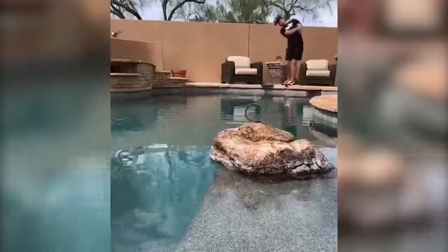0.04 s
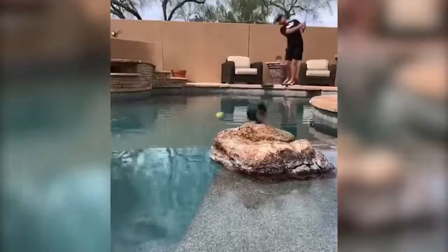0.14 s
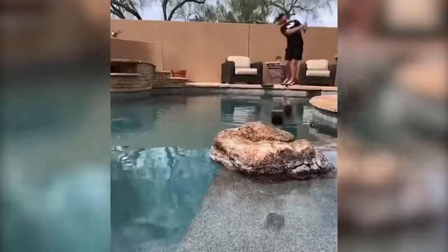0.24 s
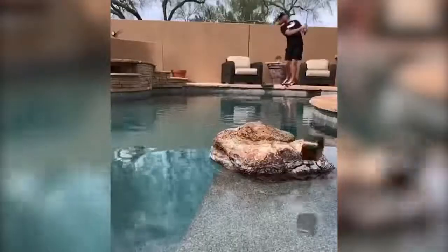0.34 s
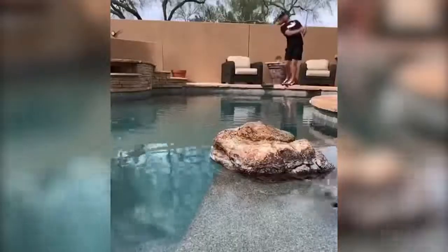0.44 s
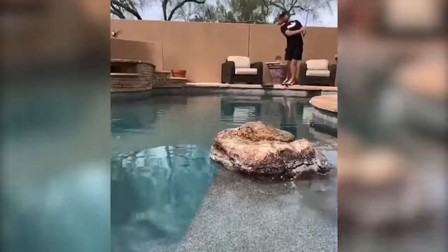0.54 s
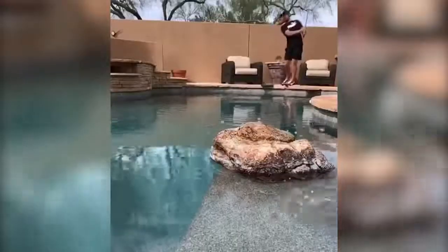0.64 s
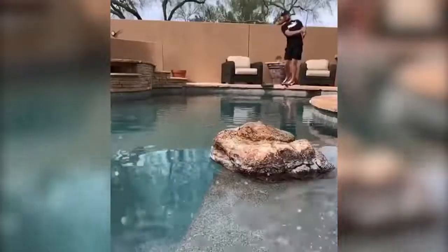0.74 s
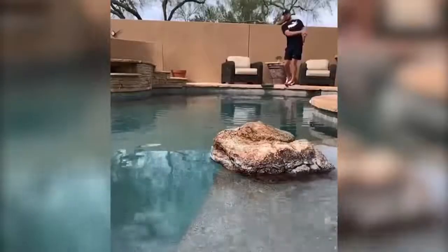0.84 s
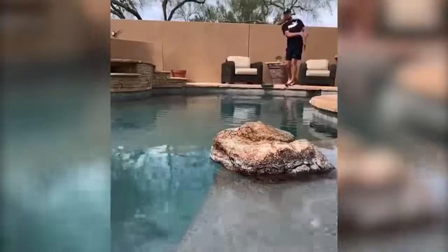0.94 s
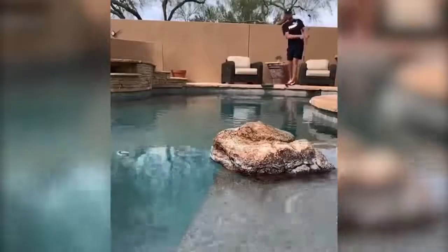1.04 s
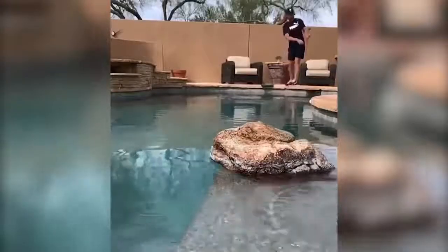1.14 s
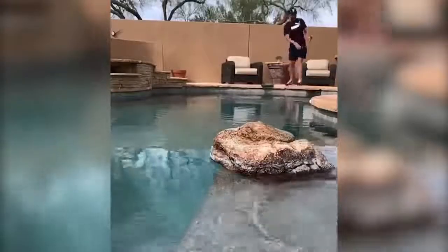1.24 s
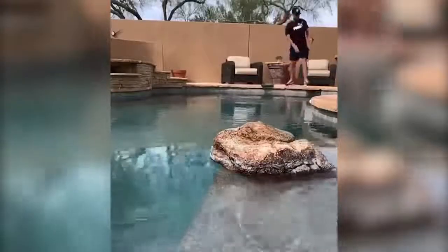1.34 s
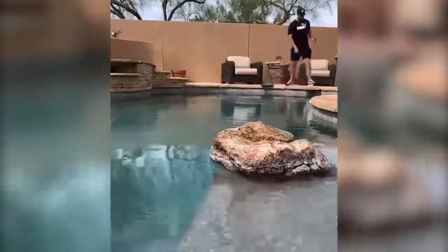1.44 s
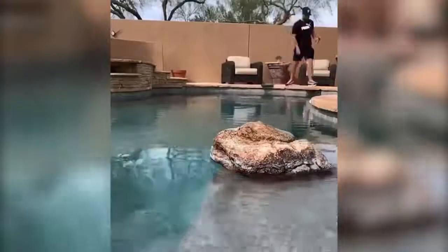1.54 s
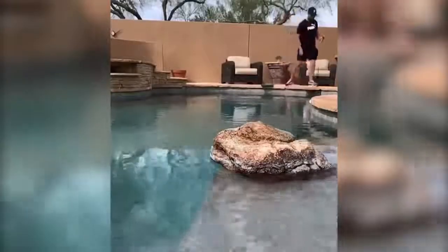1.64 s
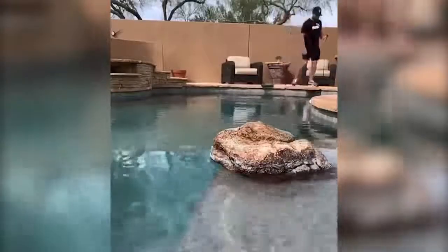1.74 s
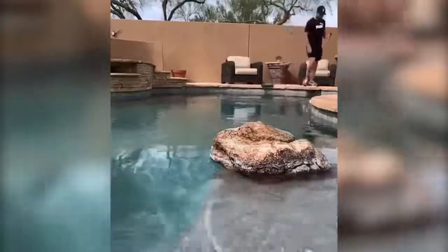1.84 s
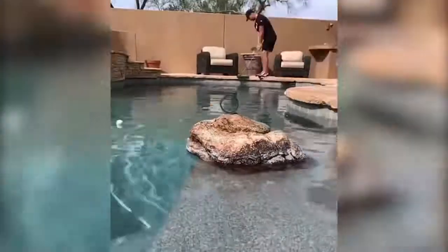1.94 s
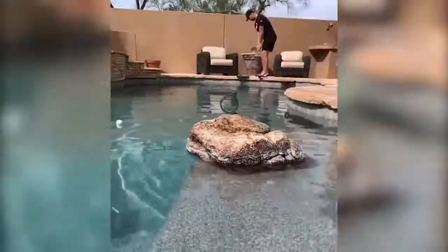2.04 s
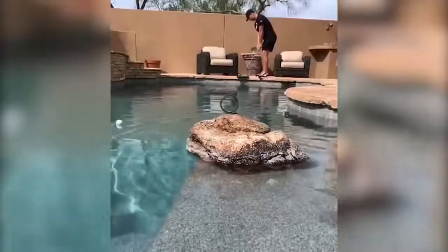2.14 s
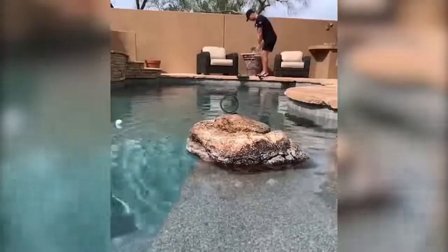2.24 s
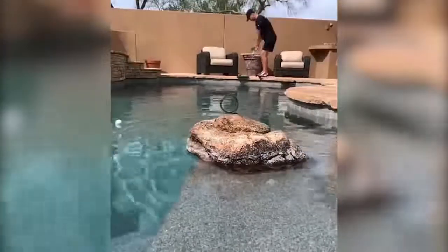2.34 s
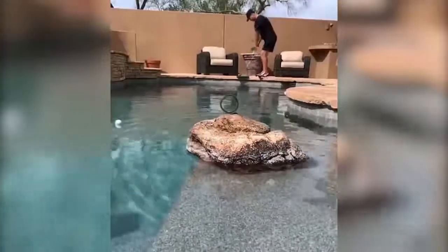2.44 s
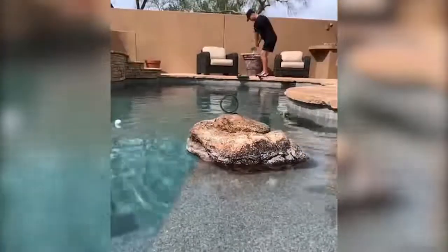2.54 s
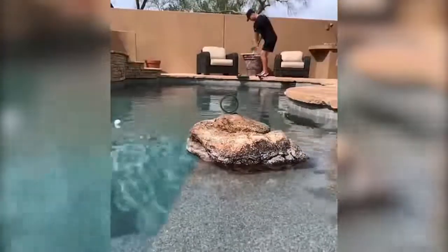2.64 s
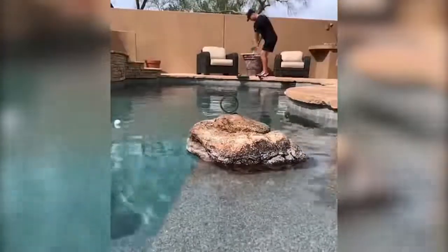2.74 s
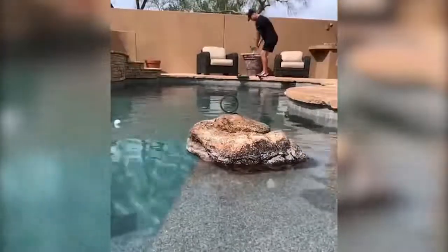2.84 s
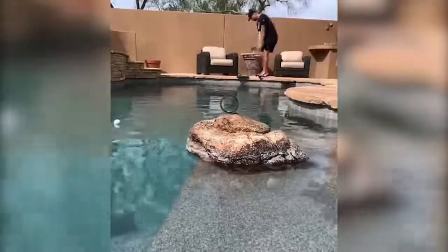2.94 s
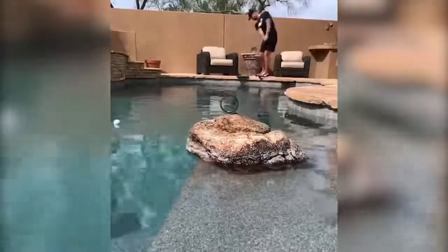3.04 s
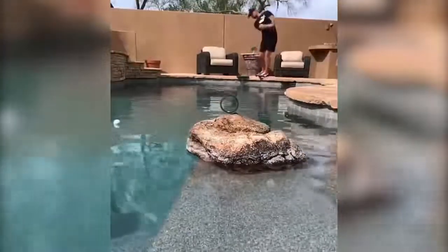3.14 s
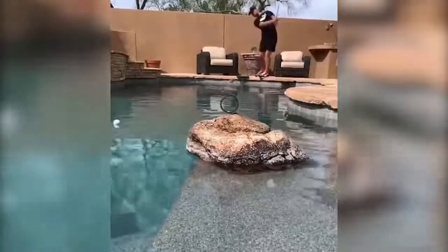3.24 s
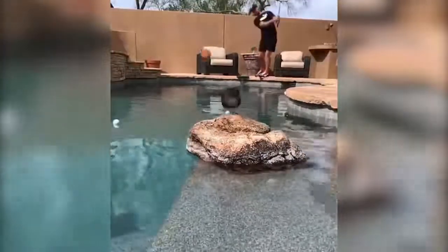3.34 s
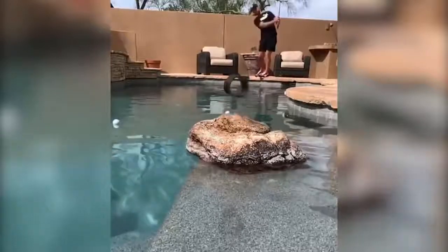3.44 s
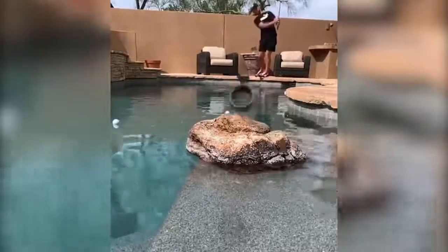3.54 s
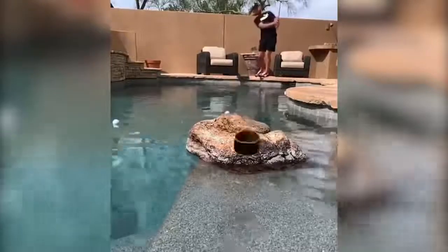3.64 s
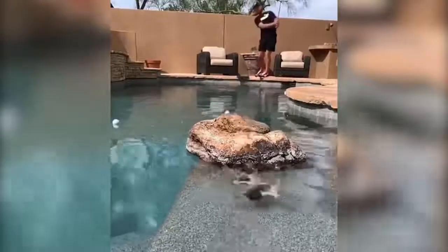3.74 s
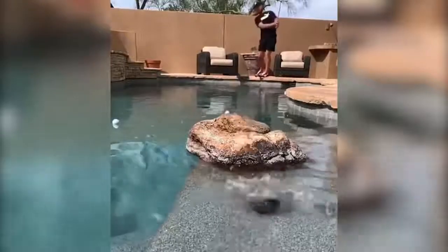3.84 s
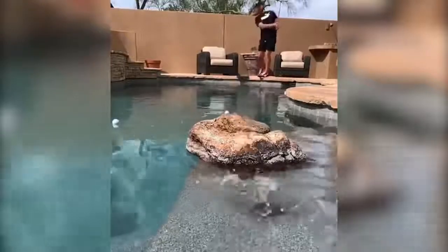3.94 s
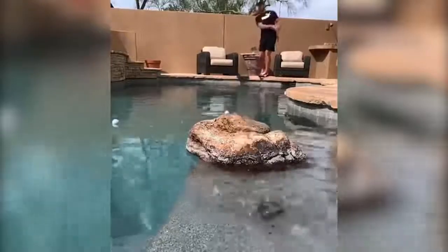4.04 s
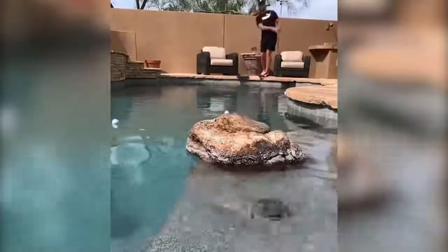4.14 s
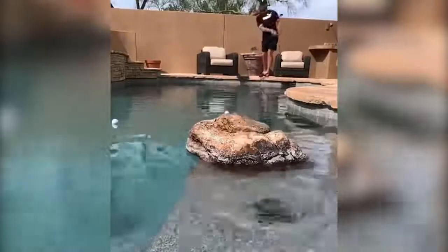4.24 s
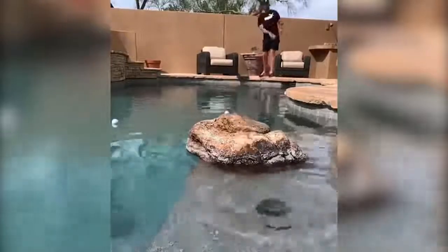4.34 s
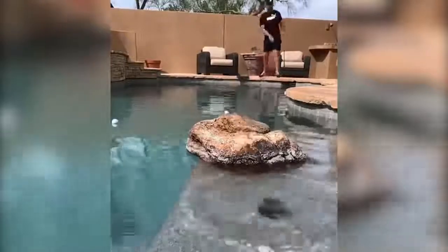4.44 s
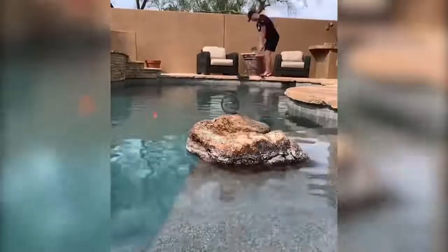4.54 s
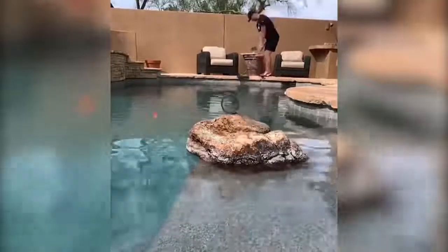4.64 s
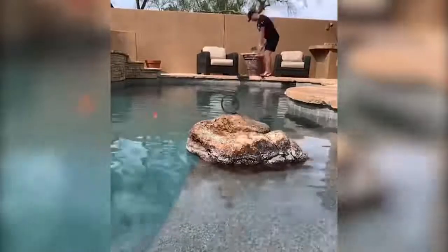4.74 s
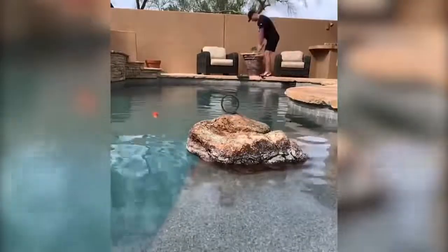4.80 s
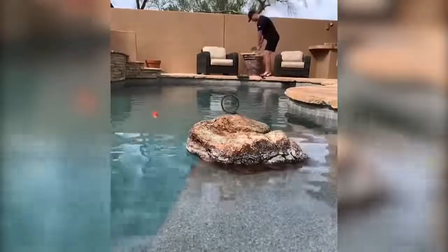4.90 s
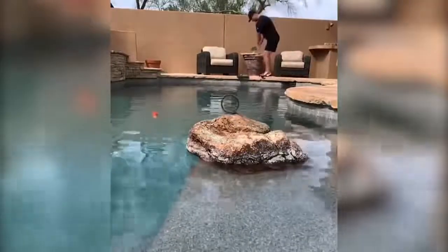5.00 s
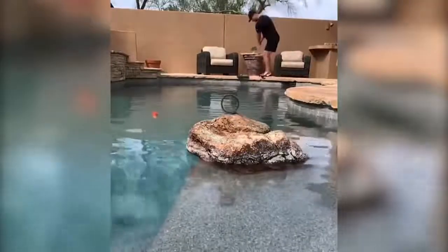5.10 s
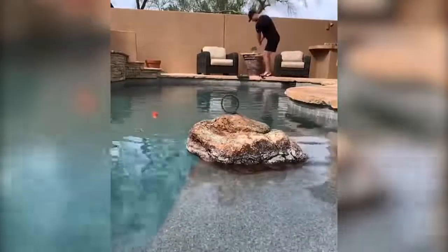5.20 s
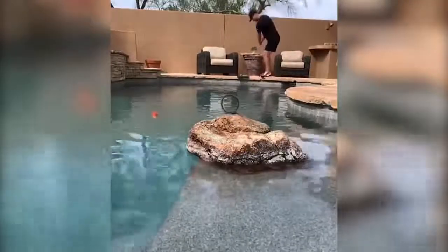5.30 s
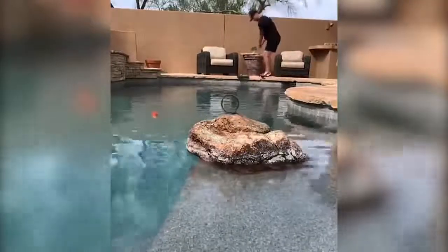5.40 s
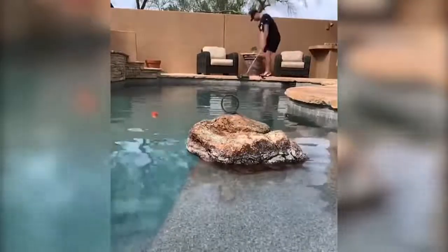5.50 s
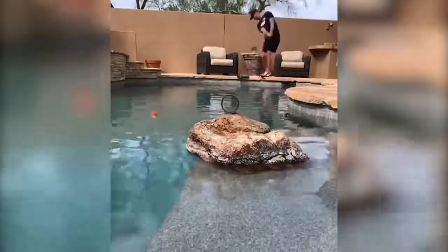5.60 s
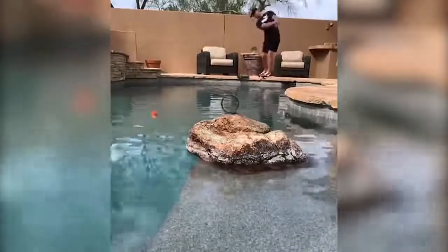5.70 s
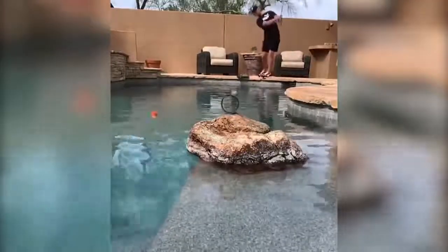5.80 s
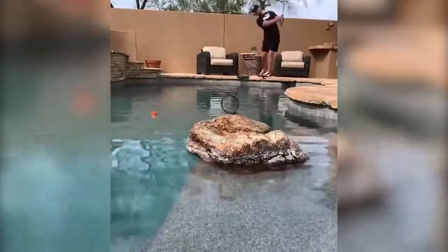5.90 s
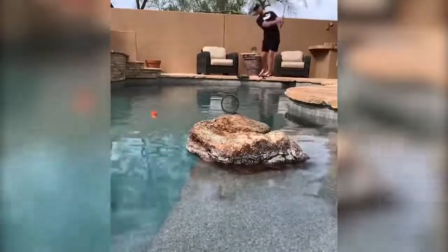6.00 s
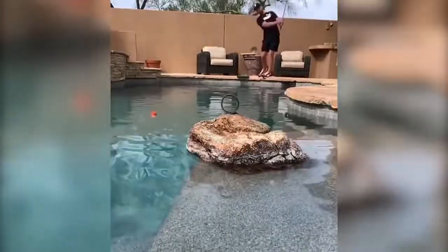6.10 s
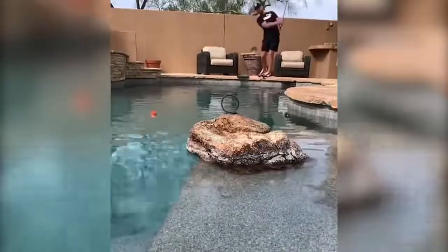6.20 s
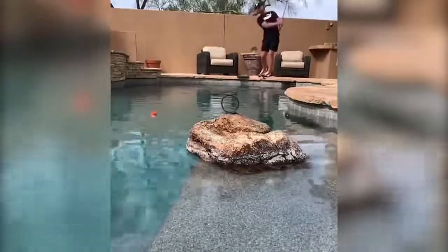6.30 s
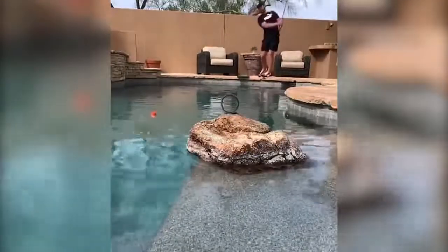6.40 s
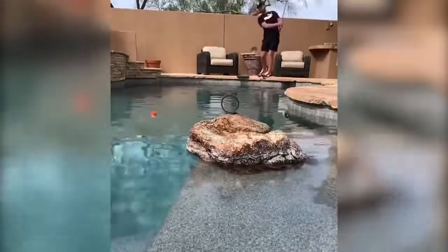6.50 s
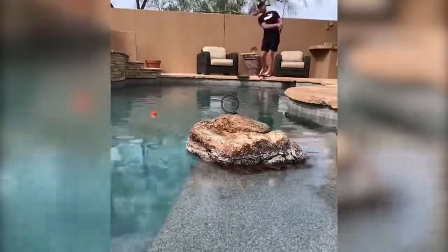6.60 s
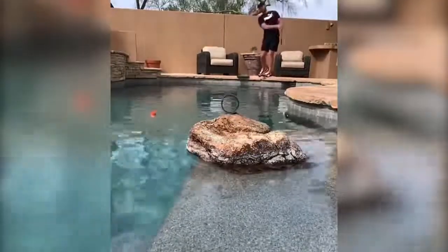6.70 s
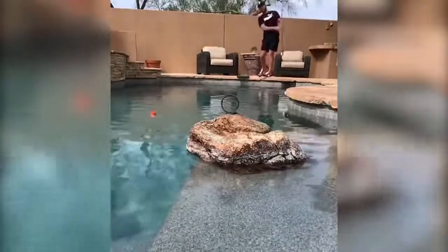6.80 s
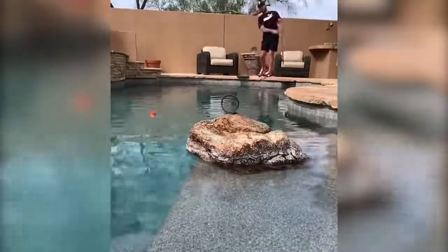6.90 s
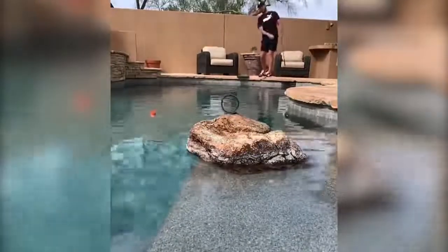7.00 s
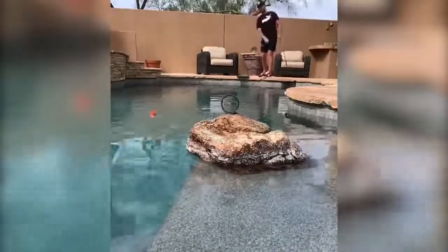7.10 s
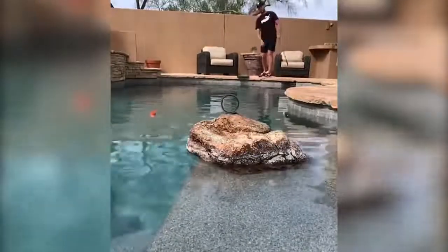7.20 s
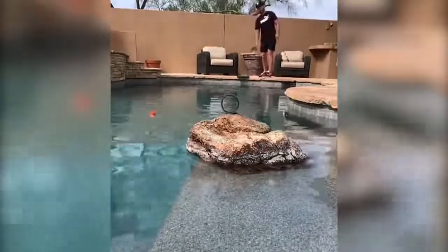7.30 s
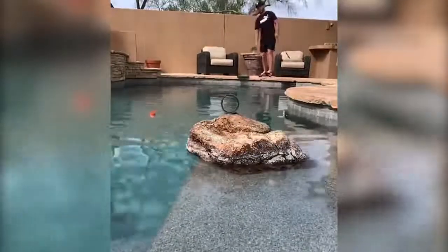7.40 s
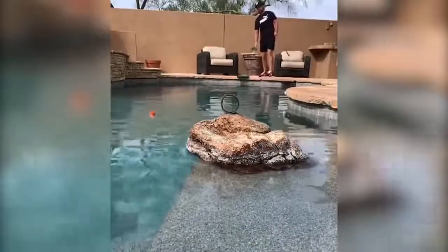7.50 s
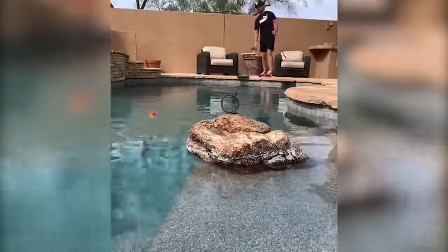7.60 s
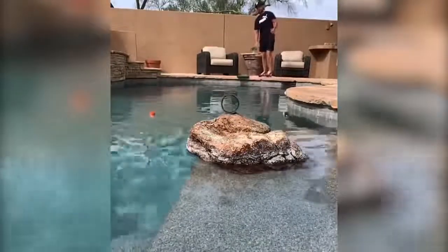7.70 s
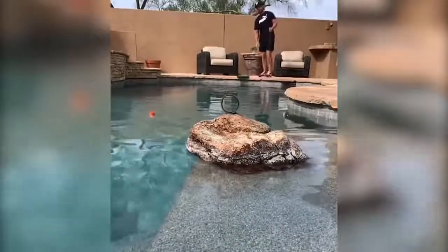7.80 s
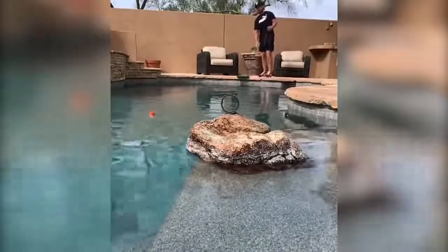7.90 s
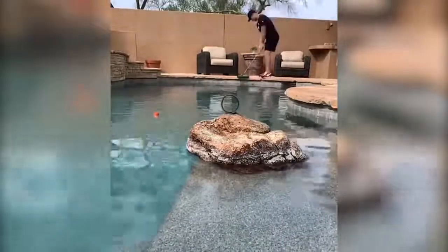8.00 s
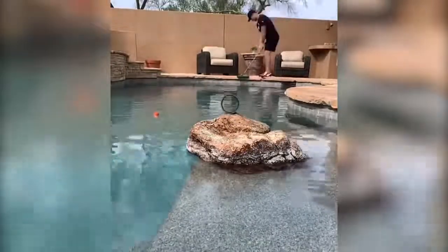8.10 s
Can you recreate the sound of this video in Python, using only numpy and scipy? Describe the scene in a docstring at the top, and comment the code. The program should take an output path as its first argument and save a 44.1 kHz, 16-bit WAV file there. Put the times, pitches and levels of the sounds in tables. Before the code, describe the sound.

A quiet low outdoor rumble fills a walled backyard. At 0.2 s a golf ball cracks off a boulder near the microphone, a click and solid clack sinking into a thud with short wall echoes. A light splash starts at 0.3, a second knock lands at 0.4, and at 0.55 a wet pop opens a gurgling, spraying splash, slapping and bubbling until about 0.9, then fizzing away. Around 3.0 a club chips a ball across the pool: sharp double click-thud and faint scrape. The ball knocks rock at 3.3 and slaps into water at 3.7, with bubbles chirping until 4.1. The level dips briefly at 4.5. A brighter chip comes at 5.55, then the hardest rock crack at 5.95, with deep thump and hollow ring. A thin splash at 6.3 drips away; small plops follow at 6.7 and 7.7, a faint slap at 7.1, and another brief dip at 8.0.

```python
"""A ball cracks off a boulder near the microphone, over a low outdoor rumble, then splashes into a pool.
This is a walled backyard where golf balls are chipped across the water: each blow is a click, a clack and
a thud sinking in pitch, answered by the walls. The water is made of noise bursts, ringing bubbles,
gurgling churn and fine spray. The level dips briefly, twice."""
import sys
import numpy as np
from scipy import signal
from scipy.fft import rfft, irfft, next_fast_len
from scipy.io import wavfile
from scipy.ndimage import uniform_filter1d, map_coordinates

SR = 44100
rng = np.random.default_rng(int(sys.argv[2]) if len(sys.argv) > 2 else 0)


def log_audio(samples):
    """Write samples as a 16-bit WAV file to the path given in sys.argv[1]."""
    # one column per channel
    frames = np.atleast_2d(samples).T
    # limit to full scale, then quantise
    limited = np.clip(frames, -1, 1)
    pcm = np.round(limited * 32767).astype(np.int16)
    wavfile.write(sys.argv[1], SR, pcm)


N = 359407  # length in samples

# Spectrum of fine spray and scraping. Each row: frequency in Hz, density in dB per Hz.
SPRAY_SPECTRUM = [(1500, -13), (2500, -5), (3300, -8.5), (4200, -5), (5300, -6.5), (7500, -2), (10300, -7),
                  (13000, -23)]
# Spectrum of churning water. Each row: frequency in Hz, density in dB per Hz.
CHURN_SPECTRUM = [(200, -3.5), (450, 0), (1000, -7), (2200, -2), (3300, -11), (6000, -37.5)]
# Spectrum of a hard click or a drop's tick. Each row: frequency in Hz, density in dB per Hz.
CLICK_SPECTRUM = [(1200, -19.5), (2600, -0.5), (4200, 3), (5300, -2.5), (8000, -4.5), (13000, -24)]
# Spectrum of bright reflections off the walls. Each row: frequency in Hz, density in dB per Hz.
SCATTER_SPECTRUM = [(400, -4.5), (1500, 4), (3000, -1.5), (5400, -9), (8000, -9), (10500, -23),
                    (13000, -36)]


def amp(db):
    """Decibels to gain."""
    return 10 ** (np.asarray(db) / 20)


def unit(x):
    """Scale to rms 1."""
    return x / np.sqrt(np.mean(x ** 2) + 1e-20)


def along(points, hz):
    """Rows of frequency and value, read on a log frequency axis."""
    f, v = np.transpose(points)
    return np.interp(np.log(hz + 1), np.log(f + 1), v)


def filtered(x, response):
    """Filter x by a complex response of frequency, padded so that little wraps round."""
    n = x.shape[-1]
    padded = next_fast_len(n + 8192)
    spectrum = rfft(x, padded) * response(np.fft.rfftfreq(padded, 1 / SR))
    return irfft(spectrum, padded)[..., :n]


def coloured(x, spectrum):
    """Shape x by a spectrum, at rms 1."""
    return unit(filtered(x, lambda hz: amp(along(spectrum, hz))))


def add(track, s, sound):
    """Mix a sound into the track at s seconds."""
    part = track[..., round(s * SR):][..., :sound.shape[-1]]
    part += sound[..., :part.shape[-1]]


def spread(pair, side_db):
    """Left and right from a shared signal and an opposed one, side_db relative to it."""
    mid, side = pair[0], amp(side_db) * pair[1]
    return np.array([mid + side, mid - side]) / np.sqrt(1 + amp(side_db) ** 2)


def burst(t, spectrum, rise, t60, side_db, rate=SR):
    """A stereo crack of fixed energy from random impulses, rate a second; rise and t60 in seconds."""
    shape = (1 - np.exp(-t / rise)) * amp(-60 * t / t60)
    struck = rng.random(len(t)) < rate / SR
    impulses = rng.standard_normal((2, len(t))) * struck
    noise = spread(coloured(impulses, spectrum), side_db)
    return unit(noise * shape) * np.sqrt(np.mean(shape ** 2))


def ports(x, lead):
    """The sound reaches the left microphone port lead seconds before the right."""
    return filtered(x, lambda hz: np.exp(1j * np.pi * hz * lead * np.array([[1], [-1]])))


def wobble(rate):
    """A random curve of straight lines between knots, rate knots a second."""
    knots = rng.standard_normal(int(N * rate / SR) + 4)
    return map_coordinates(knots, [np.arange(N) * rate / SR], order=1)


def patchy(x, depth_db, size):
    """Random patches of gain, size = (frequency bins, frames) across."""
    z = signal.stft(x, nperseg=512)[2]
    field = uniform_filter1d(rng.standard_normal(z.shape[1:]), size[0], 0)
    field = uniform_filter1d(field, size[1], 1)
    return signal.istft(z * amp(depth_db * unit(field)), nperseg=512)[1][:, :N]


def air():
    """A low outdoor rumble, nearly alike in both ears, with a faint wider hiss: shaped noise."""
    # Loudness of the open air. Each row: time in seconds, level in dB.
    air_levels = [(0, -46), (1.599, -46.5), (8.15, -45)]
    # Spectrum of the open air. Each row: frequency in Hz, density in dB per Hz.
    rumble_spectrum = [(15, -40), (25, -28), (45, -2), (74, 0.5), (122, -6.5), (213, -17), (278, -14),
                       (372, -26.5), (584, -40), (991, -43), (1260, -41.5), (2500, -49.5), (9660, -61),
                       (14000, -75)]
    rumble_gain = amp(np.interp(np.arange(N) / SR, *np.transpose(air_levels)))
    mid, side = coloured(rng.standard_normal((2, N)), rumble_spectrum)
    width = [(70, -32.5), (300, -12.5), (1500, -4.0)]  # Hz, dB
    side = filtered(side, lambda hz: amp(along(width, hz)))
    return rumble_gain * np.array([mid + side, mid - side])


def hiss_swells():
    """A faint hiss of shaped noise swells and fades, just before the last boulder blow and once more later."""
    # Faint hiss swells. Each row: loudest moment in seconds, half width in seconds, level in dB.
    swell_rows = [(5.911, 0.042, -60), (7.373, 0.018, -68)]
    # Spectrum of the hiss. Each row: frequency in Hz, density in dB per Hz.
    hiss_spectrum = [(1000, -14), (2800, -9), (4100, -3), (5400, -14.5), (8000, -14.5), (12000, -30.5)]
    t = np.arange(N) / SR
    gain = sum(amp(db) * np.exp(-.5 * ((t - s) / width) ** 2) for s, width, db in swell_rows)
    return gain * spread(coloured(rng.standard_normal((2, N)), hiss_spectrum), side_db=-6.0)


def scrapes():
    """The club scrapes on after each chip: a short burst of bright noise."""
    # The club's follow-through. Each row: start in seconds, level in dB.
    scrape_rows = [(3.031, -47), (5.638, -44.5)]
    out, t = np.zeros((2, N)), np.arange(SR // 4) / SR
    for s, db in scrape_rows:
        add(out, s, amp(db) * burst(t, SPRAY_SPECTRUM, rise=0.0024, t60=0.15, side_db=-1))
    return out


def grains(rate, centre_hz, octaves, cycles, scatter_db, size):
    """A stream of damped bubbles, each rising a little in pitch, rate a second, at rms 1."""
    count = int(rate * N / SR)
    start = rng.integers(0, N, (count, 1))
    hz = np.clip(centre_hz * 2 ** (octaves * rng.standard_normal((count, 1))), 200, SR / 3)
    gain = amp(scatter_db * np.minimum(rng.exponential(size=(count, 1)), 2.5))
    k = np.arange(size)
    turns = hz * k / SR
    life = np.exp(-turns / cycles)
    tones = np.sin(2 * np.pi * turns * (1 + .1 * (1 - life)))
    waves = gain * tones * life * (1 - k / size)
    return unit(np.bincount((start + k).ravel(), waves.ravel(), minlength=N)[:N])


def swell(t, attack, hold, sag_db, t60, linger_db, drop_db):
    """Gain of a splash: it builds, holds while water is in the air, dies away and leaves the pool unsettled."""
    landing_s, settle_t60_s = 0.014, 2.5  # the sheet of water lands; the pool settles
    after = np.maximum(t - attack - hold, 0)
    held = np.clip(t / attack, 0, 1) * amp(-sag_db * np.clip(t - attack, 0, hold))
    release = amp(-drop_db * np.minimum(after / landing_s, 1) - 60 * after / t60)
    return held * np.maximum(release, amp(linger_db - 60 * after / settle_t60_s))


def splash_gains():
    """Gain of the churn and of the spray; overlapping splashes add in power."""
    # Splashes and the last drops falling back. Each row: start in seconds, attack in seconds,
    # hold in seconds, churn level in dB, spray level in dB.
    splash_rows = [ (0, 0.0009, 0.014, -58, -58), (0.312, 0.014, 0.019, -56.5, -47.5),
                   (0.426, 0.049, 0.095, -54.5, -48.5), (0.53, 0.013, 0.17, -48.5, -52),
                   (0.669, 0.097, 0.034, -50.5, -45), (1.0, 0.15, 0.11, -110, -71),
                   (3.731, 0.0071, 0.05, -57, -50.5), (3.755, 0.028, 0.15, -50.5, -51),
                   (3.961, 0.033, 0.04, -59, -52), (6.328, 0.0065, 0.017, -66.5, -51.5),
                   (6.361, 0.033, 0.13, -67, -60.5), (6.628, 0.038, 0.04, -69.5, -70.5), ]
    # sag in dB per second of hold, t60 in seconds; the spray also thins at once as it lands
    churn_swell = dict(sag_db=7.5, t60=0.7, linger_db=-13, drop_db=0)
    spray_swell = dict(sag_db=6.5, t60=.75, linger_db=-19.5, drop_db=6.5)
    t = np.arange(N) / SR
    churn, spray = [], []
    for s, attack, hold, churn_db, spray_db in splash_rows:
        churn.append(amp(churn_db) * swell(t - s, attack, hold, **churn_swell))
        spray.append(amp(spray_db) * swell(t - s, attack, hold, **spray_swell))
    return np.linalg.norm(churn, axis=0), np.linalg.norm(spray, axis=0)


def splashes():
    """Churning froth, gurgling bubbles and clumps of coarse droplets under a dense wash of fine spray."""
    def stereo_grains(**settings):
        """Two independent streams of bubbles."""
        return np.array([grains(**settings) for _ in range(2)])

    churn_gain, spray_gain = splash_gains()
    froth = stereo_grains(rate=2400, centre_hz=1400, octaves=.9, cycles=2, scatter_db=3, size=256)
    gurgle = stereo_grains(rate=420, centre_hz=1450, octaves=.65, cycles=7, scatter_db=4, size=900)
    coarse = stereo_grains(rate=900, centre_hz=3900, octaves=.35, cycles=9, scatter_db=4, size=400)
    fizz = stereo_grains(rate=2200, centre_hz=6500, octaves=.5, cycles=10, scatter_db=4, size=256)
    churn = coloured(patchy(.8 * froth + gurgle, depth_db=3.5, size=(7, 4)), CHURN_SPECTRUM)
    droplets = amp(-6) * unit(coarse * amp(4 * wobble(rate=60)))  # 6 dB under the churn
    wash = fizz + rng.standard_normal((2, N))
    spray = coloured(patchy(wash, depth_db=3.2, size=(12, 7)), SPRAY_SPECTRUM)
    churning = churn_gain * spread(churn + droplets, side_db=-6.0)
    return churning + spray_gain * spread(spray, side_db=2.0)


def drips():
    """Single drops hit the surface with a sharp tick of noise."""
    # Single drops. Each row: start in seconds, level in dB.
    drip_rows = [(0.534, -34.5), (.921, -47), (6.3746, -50), (6.461, -52), (6.56, -55)]
    out, t = np.zeros((2, N)), np.arange(SR // 25) / SR
    for s, db in drip_rows:
        add(out, s, amp(db) * burst(t, CLICK_SPECTRUM, rise=0.00041, t60=0.053, side_db=-8))
    return out


def plops():
    """Clusters of bubbles burst together in a blurred, hollow plop: noise peaked around one pitch."""
    # Soft plops. Each row: start in seconds, level in dB, pitch in Hz.
    plop_rows = [(.964, -44, 1235), (6.678, -54, 2154), (7.703, -51, 988)]
    out, t = np.zeros((2, N)), np.arange(SR // 5) / SR
    for s, db, hz in plop_rows:
        hollow = [(hz / 2, -26), (hz, 0), (hz * 2, -26), (hz * 10, -60)]
        add(out, s, amp(db) * burst(t, hollow, rise=0.0038, t60=0.11, side_db=-5.5))
    return out


def bubbles():
    """Trapped air pinches off with a wet pop and rings; short-lived bubbles chirp upwards."""
    # The largest bubbles. Each row: start in seconds, level in dB, starting pitch in Hz, t60 in seconds.
    bubble_rows = [(.5435, -19.5, 863, 0.019), (0.559, -30.5, 2310, 0.029), (0.8271, -25.5, 1980, 0.046),
                   (0.841, -33.5, 1784, 0.052), (3.702, -26.5, 915, 0.021), (3.715, -23.5, 892, 0.032),
                   (3.803, -29.5, 830, 0.031), (3.857, -31, 1540, 0.018), (3.907, -31, 2450, 0.017),
                   (3.925, -33.5, 774, 0.11), (3.999, -34, 1315, 0.033), (4.067, -31.5, 2500, 0.011),
                   (4.102, -32, 1229, 0.051)]
    chirp_s, pop_db = 0.013, -16  # a t60 this short rises an octave over it; pop relative to the ring
    out, t = np.zeros((2, N)), np.arange(SR // 6) / SR
    for s, db, hz, t60 in bubble_rows:
        glide = (chirp_s / t60) ** 2
        phase = 2 * np.pi * hz * (t + glide * t ** 2 / (2 * t60))
        ring = amp(-60 * t / t60) * (1 - np.exp(-t / 0.00084)) * np.sin(phase)
        pop = amp(pop_db) * burst(t, CHURN_SPECTRUM, rise=0.00038, t60=0.057, side_db=-8.5)
        add(out, s, amp(db) * (ring + pop))
    return out


def slaps():
    """Water snaps shut behind the ball and thrown sheets fall back: a bright snap and a low plop."""
    # Slaps on the water. Each row: start in seconds, level in dB, low plop in dB relative to it.
    slap_rows = [(0.3167, -41, -5), (0.3277, -37.5, -20), (.541, -42.5, 11.5), (0.667, -35, 0.5),
                 (0.7862, -33.5, -1.5), (3.679, -32.5, -6.5), (3.6994, -31.5, -7.5), (3.7133, -20, -8.5),
                 (3.8029, -37, 4), (3.9048, -33, -26), (4.014, -38, -19), (6.331, -39, -11),
                 (6.5026, -43.5, -16), (7.0838, -48, -13)]
    out, t = np.zeros((2, N)), np.arange(SR // 12) / SR
    for s, db, plop_db in slap_rows:
        snap = burst(t, SPRAY_SPECTRUM, rise=0.0016, t60=0.027, side_db=-0.5)
        plop = amp(plop_db) * burst(t, CHURN_SPECTRUM, rise=0.0013, t60=0.035, side_db=-12.5)
        add(out, s, amp(db) * (snap + plop))
    return out


def pool_echo(x):
    """The water sounds, blurred by a short reverberation from the pool's rim and walls."""
    tail = burst(np.arange(SR // 3) / SR, SCATTER_SPECTRUM, rise=0.004, t60=.28, side_db=-3.5)
    echo = signal.fftconvolve(x, tail / np.linalg.norm(tail[0]), axes=1)[:, :N]
    return x + amp(-20) * echo


def hollow_ring():
    """A few close, beating tones linger in the yard after the hardest bounce."""
    start_s, level_db, t60_s = 5.988, -39.5, .45
    out, t = np.zeros((2, N)), np.arange(SR // 2) / SR
    modes = sum(np.sin(2 * np.pi * (hz * t + rng.random())) for hz in (480, 518, 567))
    add(out, start_s, amp(level_db - 60 * t / t60_s) * (1 - np.exp(-t / .004)) * modes)
    return out


def yard(boom_db, bright_db, boom_t60):
    """Reflections from walls and furniture: a lumpy low boom and a rough bright scatter."""
    # Spectrum of the low reverberation. Each row: frequency in Hz, density in dB per Hz.
    boom_spectrum = [(110, -25), (230, 2), (330, 8), (560, 1.5), (800, -13), (1300, -25), (3000, -57)]
    t = np.arange(SR // 2) / SR
    # rate: echoes a second
    boom = burst(t, boom_spectrum, rise=0.0023, t60=boom_t60, side_db=-13.5, rate=3000)
    scatter = burst(t, SCATTER_SPECTRUM, rise=0.0011, t60=0.37, side_db=-2.0, rate=4000)
    return amp(boom_db) * boom + amp(bright_db) * scatter


def sinking(t, spectrum, pitch_hz, lag_cycles=2.08, lag_slope=.75):
    """A pulse whose low part arrives a few ms late, so that it sinks quickly in pitch; peak 1."""
    hz = np.fft.rfftfreq(len(t), 1 / SR)
    delay = lag_cycles / pitch_hz * np.maximum(hz / pitch_hz, .5) ** -lag_slope
    phase = -2 * np.pi * np.cumsum(delay) * hz[1]  # delay summed over frequency
    pulse = irfft(amp(along(spectrum, hz)) * np.exp(1j * phase), len(t))
    return pulse / np.abs(pulse).max()


def blows(rows, clack_t60, click_t60, walls):
    """A bright click and solid clack sink into a thud over a deep thump, and the yard answers."""
    # Spectrum of the thud. Each row: multiple of its pitch, level in dB.
    thud_spectrum = [(.1, -31.5), (.33, -30.5), (.55, -8.5), (.8, 7.5), (1.1, 12), (1.6, -2), (2.05, -10.5),
                     (3.3, -23), (5, -31), (9, -30.5), (20, -70.5)]
    # Spectrum of the clack. Each row: frequency in Hz, density in dB per Hz.
    clack_spectrum = [(250, -17), (570, 4), (820, -0.5), (1030, -8.5), (1400, -2), (2000, -3.5),
                      (2800, -18.5), (6000, -42)]
    rattle_db = -9  # diffuse part of a clack, relative to its direct pulse
    # thump under a full-scale thud; it grows in dB per dB of thud, so the hardest blow has by far the most
    push_db, push_grows, push_hz, push_t60_s = -23, 7.8, 42, 0.13
    out, t = np.zeros((2, N)), np.arange(SR // 16) / SR
    for s, thud_db, pitch_hz, clack_db, click_db, echo_s, boom_db, bright_db, boom_t60 in rows:
        thud = amp(thud_db) * sinking(t, [(k * pitch_hz, db) for k, db in thud_spectrum], pitch_hz)
        clack = amp(clack_db) * sinking(t, clack_spectrum, pitch_hz) * amp([[-1.2], [1.2]])  # to the right
        rattle = burst(t, clack_spectrum, rise=0.0004, t60=clack_t60, side_db=-2.0)
        click = amp(click_db) * burst(t, CLICK_SPECTRUM, rise=0.001, t60=click_t60, side_db=-1.0)
        blow = ports(thud + click, lead=0.00011) + amp(clack_db + rattle_db) * rattle
        add(out, s, blow + clack)
        push_gain = amp(push_db + push_grows * thud_db - 60 * t / push_t60_s)
        add(out, s, push_gain * np.sin(2 * np.pi * push_hz * t))
        add(out, s + echo_s, yard(boom_db, bright_db, boom_t60))
        for delay, db in walls:
            add(out, s + echo_s + delay, amp(db) * blow)
    return out


def scene():
    """Blows and water across the yard, over the outdoor air."""
    # The club, across the pool, in pairs: on the ball, then on the ground. Each row: start in seconds,
    # thud in dB, thud pitch in Hz, clack in dB, click in dB, first echo in seconds after the blow,
    # low reverberation in dB, bright reverberation in dB, low t60 in seconds.
    chip_rows = [ (2.9552, -12, 301, -26, -20.5, 0.0018, -28, -38.5, 0.42),
                 (2.9665, -14.5, 263, -42, -32, 0.0018, -40.5, -45.5, 0.8),
                 (5.5495, -12, 299, -20, -16.5, .002, -22.5, -34, .4),
                 (5.5605, -15, 248, -28.5, -24, 0.0023, -38, -42, 0.63), ]
    # The ball, near the microphone: boulder, second bounce, shallows, boulder, faint knock, boulder.
    # Each row: start in seconds, thud in dB, thud pitch in Hz, clack in dB, click in dB, first echo in
    # seconds after the blow, low reverberation in dB, bright reverberation in dB, low t60 in seconds.
    bounce_rows = [ (.1725, -4.5, 302, -19, -17.5, 0.017, -27.5, -39, 0.41),
                   (0.3905, -8, 361, -24.5, -27.5, 0.02, -44, -47, 0.66),
                   (0.5423, -20, 490, -44, -31, 0.019, -44, -48, 0.53),
                   (3.306, -9, 291, -25, -22.5, 0.018, -35, -46, 0.38),
                   (5.879, -37, 328, -53, -65, 0.037, -54.5, -67, 0.9),
                   (5.9555, 0.5, 300, -9, -13.5, 0.023, -30.5, -47, .5), ]
    # Walls that answer the club. Each row: seconds after the first echo, level in dB.
    chip_walls = [(.057, -25.5)]
    # Walls that answer the ball. Each row: seconds after the first echo, level in dB.
    bounce_walls = [(.002, -21.5), (.03, -25), (.095, -29.5)]
    water = slaps() + drips() + plops() + bubbles() + splashes()
    water = pool_echo(water) * amp([[-.6], [.6]])  # a little to the right
    chips = blows(chip_rows, clack_t60=0.035, click_t60=0.026, walls=chip_walls)
    bounces = blows(bounce_rows, clack_t60=0.022, click_t60=0.014, walls=bounce_walls)
    events = chips + bounces + hollow_ring() + water + scrapes() + hiss_swells()
    return ports(events, lead=.00002) + ports(air(), lead=.00008)


def microphone(x):
    """The microphone pair colours what its ports share and, separately, what differs between them."""
    # Colour of the shared sound. Each row: frequency in Hz, gain in dB.
    mid_colour = [(750, -0.5), (970, 0), (1300, 1.5), (2500, 0.5), (3300, -4.5), (4200, 0.5), (5400, -4.5),
                  (6500, 1.5), (11000, 3.5), (12800, 1.5)]
    # Colour of the difference. Each row: frequency in Hz, gain in dB.
    side_colour = [(450, -2.5), (680, 12.5), (1050, -0.5), (2000, 0), (3300, 0), (5400, 0), (6500, -2),
                   (7500, -10.5), (9200, -16), (10500, 3.5), (12500, 11)]
    mid_side = np.array([x[0] + x[1], x[0] - x[1]]) / 2
    mid, side = filtered(mid_side, lambda hz: amp([along(mid_colour, hz), along(side_colour, hz)]))
    return np.array([mid + side, mid - side])


def record(dry):
    """After the microphone, peaks are rounded off, the level dips twice and the top is cut steeply."""
    # Brief dips in level. Each row: start in seconds, end in seconds.
    dip_rows = [(4.491, 4.535), (8.001, 8.048)]
    dip_db, top_hz = -23, 13300
    t = np.arange(N) / SR
    dipped = uniform_filter1d(sum(1.0 * ((t > a) & (t < b)) for a, b in dip_rows), size=128)
    heard = microphone(dry)
    rounded = heard / (1 + np.abs(heard / .97) ** 6) ** (1 / 6)
    return filtered(rounded * amp(dip_db * dipped), lambda hz: 1 / (1 + (hz / top_hz) ** 90))


dry = scene()
out = record(dry)
log_audio(out)
```